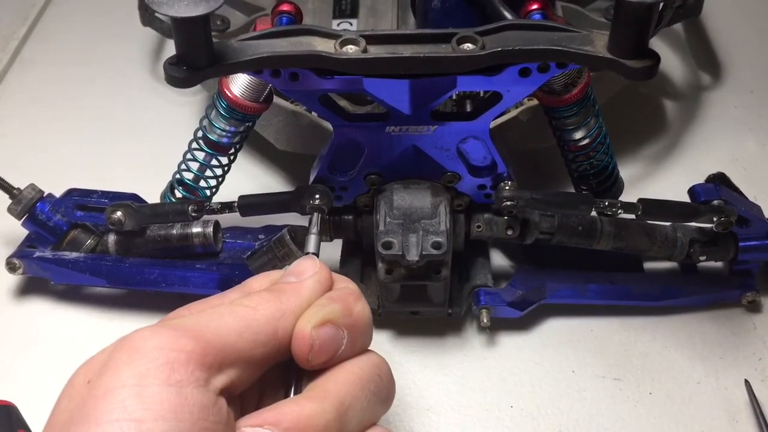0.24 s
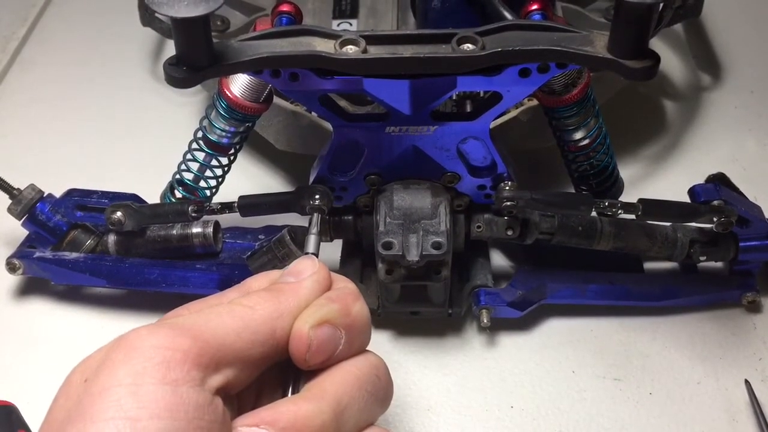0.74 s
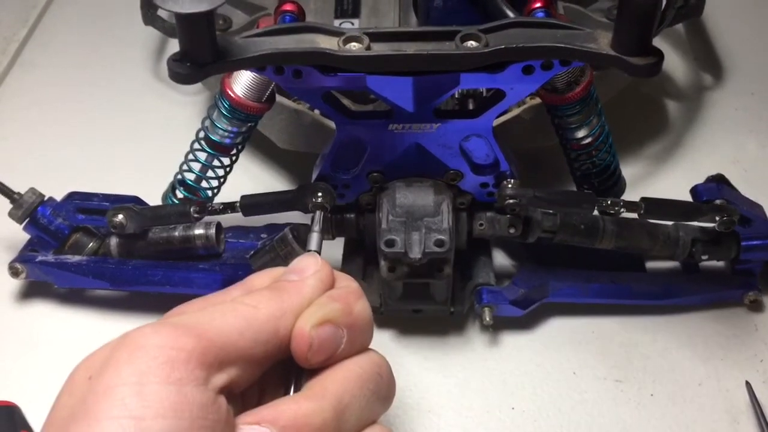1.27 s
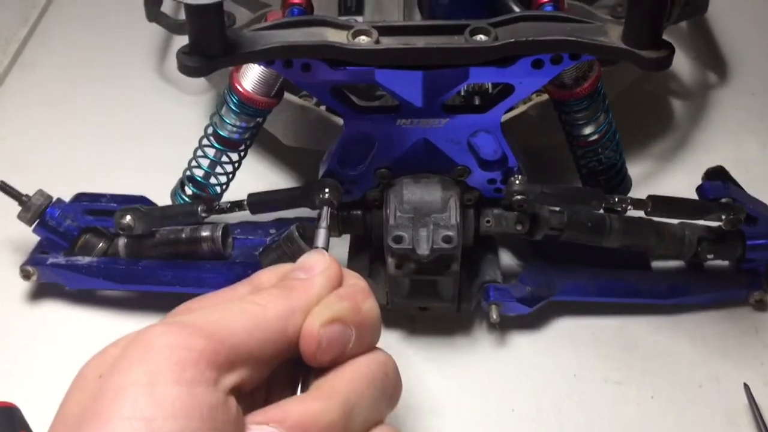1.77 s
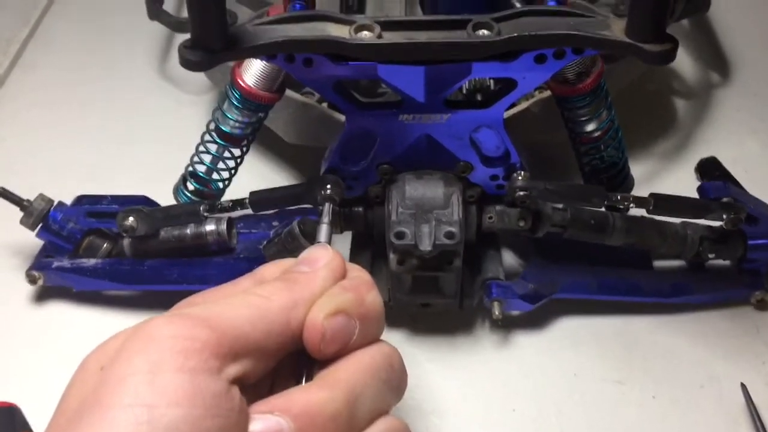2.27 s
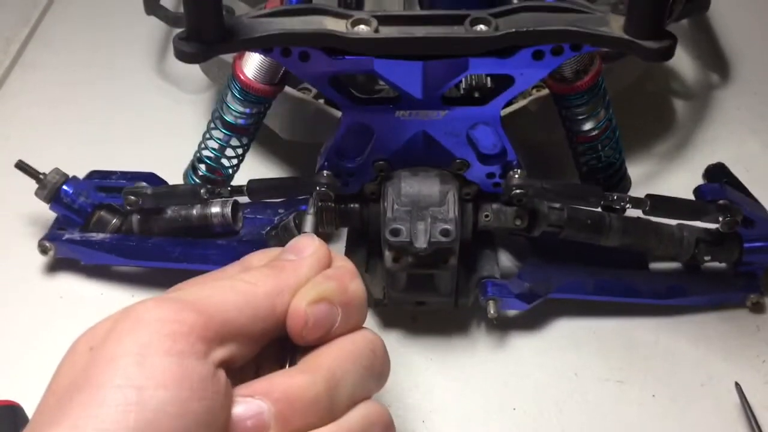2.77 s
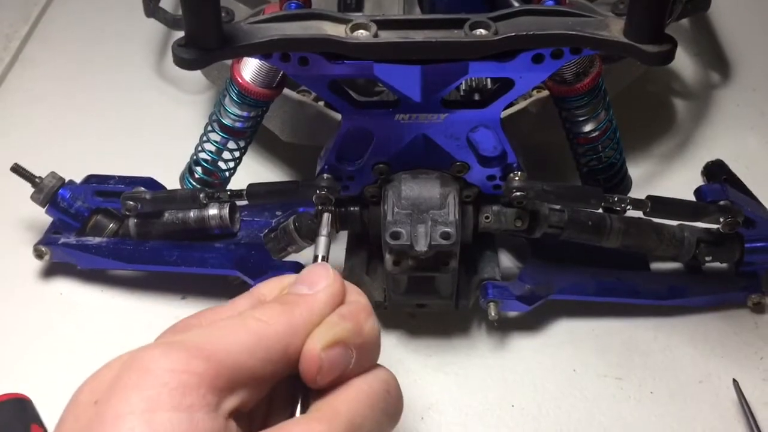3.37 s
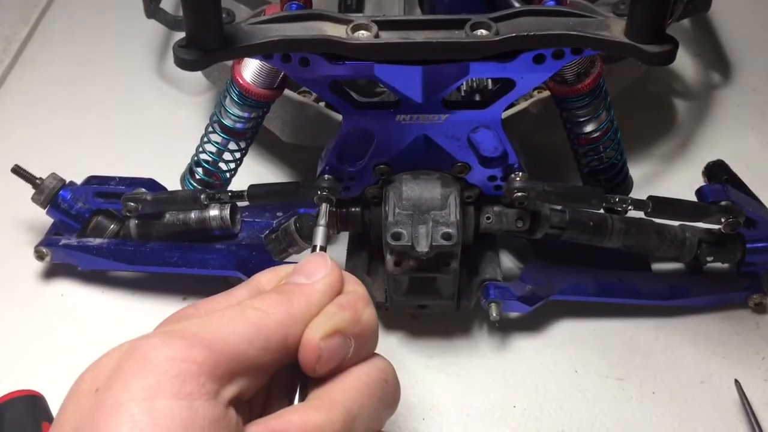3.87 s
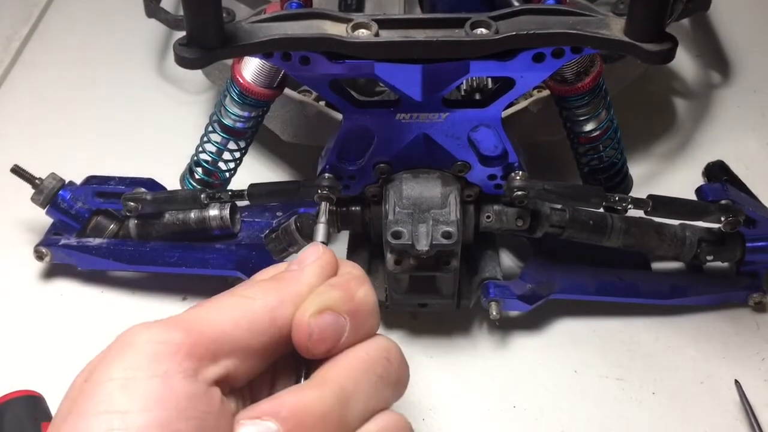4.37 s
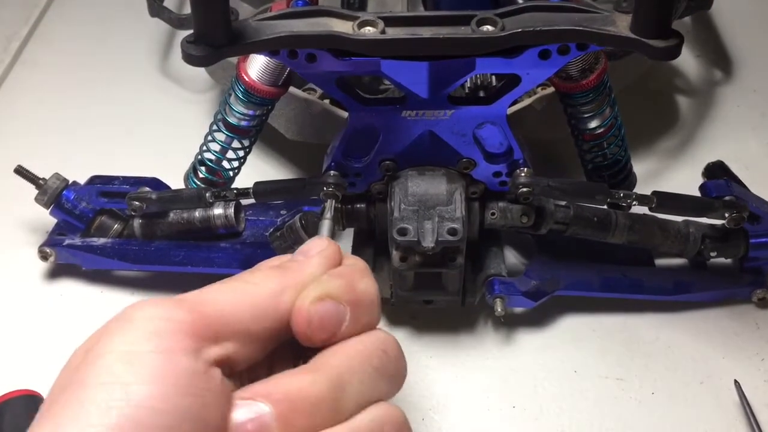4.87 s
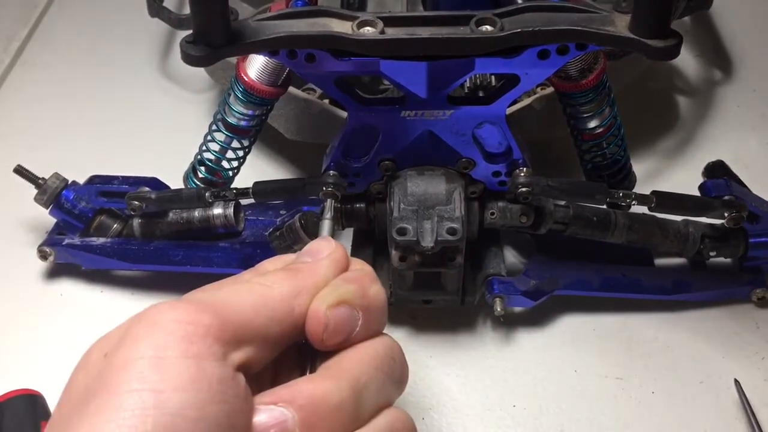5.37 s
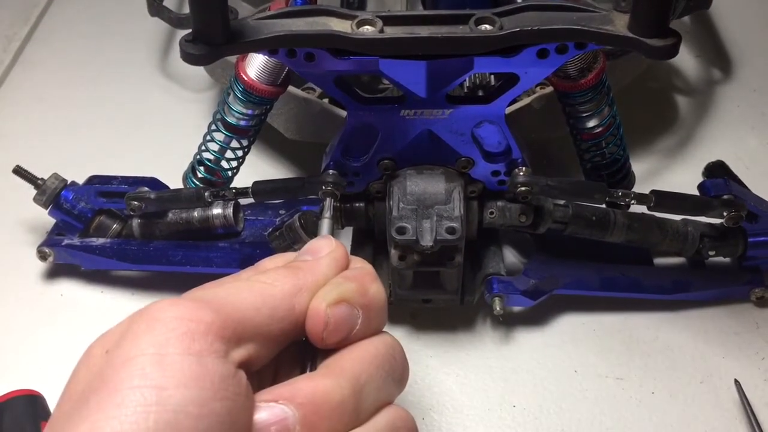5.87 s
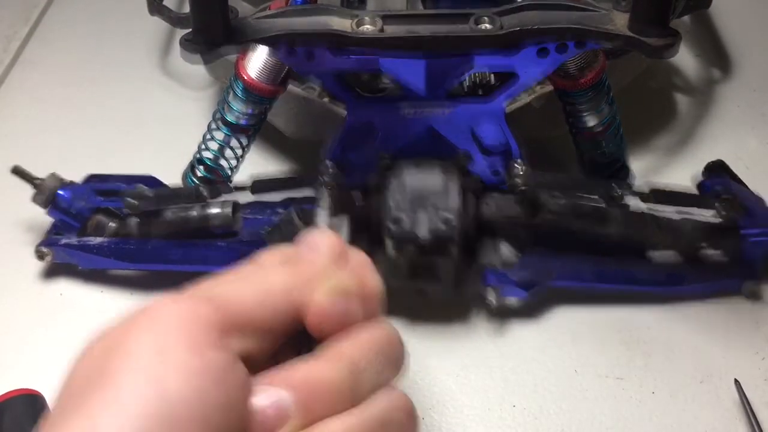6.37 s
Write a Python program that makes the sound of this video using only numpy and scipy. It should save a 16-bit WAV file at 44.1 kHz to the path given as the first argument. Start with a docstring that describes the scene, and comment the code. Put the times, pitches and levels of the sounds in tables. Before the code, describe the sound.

A close microphone in a quiet indoor room picks up low rumble and faint hiss. A soft hand bump thuds on the table at 0.3 s, a weaker one at 0.7. Hammer blows on a steel bit crack out at about 1.0, 1.5, 2.0 and 2.5 s, very loud and slightly overloaded, the later ones brighter. Each has a hard metallic clink, low tabletop boom, short hum, chattering loose parts and a faint thin ring. Little bounces clatter between them, with a sharp bright tick at 2.15. A crisp small tick at 2.9 and a soft bump near 3.0 end the burst. Then mostly quiet: a dull tick at 3.55, faint handling, a distinct tap at 5.0, and a small knock with a brief scrape around 5.9. A final full-bodied blow hits at 6.45, its ring quickly damped, followed by small rattling bounces.

```python
"""A hammer drives a steel bit against a screw in a small chassis on a table in a quiet room.
Blows and taps are shaped noise through chassis resonances, with a clink and dying sines for the table top.
Blows add chattering loose parts, a low hum and a thin steel ring; small parts ping, the bit scrapes
and hands bump the table. Sparse room echoes, rumble and hiss lie behind; overloaded peaks clip."""
import sys
import numpy as np
from scipy import signal
from scipy.io import wavfile
from scipy.ndimage import uniform_filter1d

SR = 44100
rng = np.random.default_rng(int(sys.argv[2]) if len(sys.argv) > 2 else 0)


def output_pcm(signal):
    """Save a mono or channel-first signal as 16-bit PCM at the path in sys.argv[1].

    Samples are clipped to [-1, 1] before scaling.
    """
    pcm = np.clip(np.atleast_2d(signal).T, -1, 1) * 32767
    wavfile.write(sys.argv[1], SR, np.round(pcm).astype(np.int16))


N = 292824

# Levels in the tables are layer levels ahead of the mix gains.
# Hammer blows: (time [s], crack [dB], body under 2.4 kHz [dB], clink [Hz], table [dB], hum [dB],
# shaking [dB], free ring before the grip tightens [s])
HAMMER_BLOWS = [(0.9822, -2.5, -10.5, 1462, -9, -26, -25, 0.6),
                (1.4946, -1, -10.5, 1470, -7.5, -22, -16.5, .6), (1.9928, 1, -11, 1930, -6, -15, -15, 0.64),
                (2.463, 2, -13, 2326, -7, -14.5, -12, 0.41), (6.4558, 0.5, -7, 2060, -7.5, -21, -19, 0.023)]
# Bounces and ticks of parts and tools: (time [s], crack [dB], body under 2.4 kHz [dB],
# edge over 5 kHz relative to the crack [dB], clink [Hz], table [dB])
PART_TAPS = [(1.0111, -9.5, -21, -12, 1060, -24.5), (1.3719, -46.5, -31, -20, 1037, -28),
             (1.3869, -63.5, -45, -20, 910, -30), (1.518, -8, -16.5, -17, 970, -15),
             (1.5399, -13, -34, -28, 1630, -16), (1.561, -17.5, -22.5, -29, 1780, -15),
             (1.5744, -18.5, -24, -9.5, 900, -20), (1.599, -20, -20.5, -19.5, 795, -50),
             (1.8096, -48.5, -27, -14.5, 910, -19.5), (1.8282, -47, -32, -12, 802, -27.5),
             (1.849, -46, -39, -9.5, 1500, -30.5), (2.0733, -18.5, -18, -15.5, 1256, -19),
             (2.1212, -42, -32.5, -18, 1730, -33), (2.146, -3.5, -39.5, -15, 4994, -45),
             (2.1592, -21, -35, -30, 2820, -41.5), (2.1808, -43, -34, -20, 1034, -37),
             (2.3467, -54, -34.5, -14, 1750, -30.5), (2.3767, -51, -44.5, -20, 1503, -29),
             (2.5096, -7, -14, -9.5, 3180, -11.5), (2.524, -23, -34, -4, 724, -15.5),
             (2.5532, -13, -14.5, -12, 940, -22.5), (2.596, -25.5, -22.5, -18, 1830, -25.5),
             (2.6494, -34, -34, -23, 1010, -31), (2.8484, -53.5, -33.5, -33, 812, -29),
             (2.8721, -52, -44.5, -10, 843, -34), (2.8928, -39, -46.5, -10, 5490, -36.5),
             (2.9151, -11.5, -21, -11.5, 6130, -41.5), (2.9426, -41, -46.5, -10.5, 697, -36),
             (3.0035, -27.5, -41, -8.5, 2570, -47), (3.0332, -38, -48, -10, 2780, -54),
             (3.4501, -56.5, -50.5, -18.5, 2746, -45), (3.556, -26.5, -29.5, -26.5, 2657, -34),
             (3.6522, -52, -40, -18, 1042, -42.5), (3.8686, -44.5, -42, -20, 1040, -48),
             (4.562, -58.5, -62.5, -17.5, 1300, -54), (4.759, -43, -49, -18, 1346, -51),
             (4.926, -69, -79.5, -1, 14040, -66.5), (4.9898, -11, -19, -18, 2420, -35),
             (5.8747, -24.5, -21.5, -22, 1340, -19), (5.8883, -35, -27.5, -20, 1027, -25.5),
             (6.5109, -15, -38, -27, 820, -20), (6.556, -20, -52, -14, 900, -44),
             (6.5709, -28, -35, -10, 5540, -42), (6.59, -22.5, -18.5, -17, 1800, -37.5)]
# Soft bumps of a hand on the table: (time [s], level [dB])
HAND_BUMPS = [(0.319, -19), (0.733, -38), (2.966, -18.5), (3.987, -41), (4.221, -58), (4.563, -47.5),
              (4.859, -55.5), (5.595, -48), (5.648, -49.5), (5.789, -54.5), (6.251, -43), (6.287, -52.5)]
# Short scrapes of the bit in the screw head: (start [s], length [s], level [dB], body relative to it [dB])
BIT_SCRAPES = [(1.816, 0.079, -49.5, 7.5), (2.4, .08, -62.5, 18), (3.858, 0.04, -61.5, 10),
               (3.583, 0.11, -62.5, 9), (5.871, 0.035, -26, -7), (6.24, .13, -55.5, -14)]
# Table-top modes: (frequency [Hz], level under a blow [dB], level under a tap or bump [dB], t60 [s],
# side that moves first [+1 or -1])
TABLE_MODES = [(53.7, -13, -20.5, 0.15, 1), (93, -3, -9.5, 0.12, -1), (118.2, -1.5, -1.5, .28, 1),
               (155.7, -7, -8.5, 0.026, 1), (176.3, -5.5, -15, 0.17, -1), (191.8, -13, -15, .5, 1),
               (237.8, -5.5, -13.5, 0.23, -1), (283.4, -13.5, -13.5, 0.19, -1),
               (311.3, -11.5, -14, 0.13, 1), (355.3, -11, -11.5, 0.24, -1), (415.4, -19.5, -18.5, 0.24, 1),
               (487, -13.5, -18.5, 0.18, -1), (521, -20.5, -19.5, 0.11, 1), (665, -21, -22, 0.27, -1)]
# Chassis resonances: (frequency [Hz], width [Hz], level over the plain crack [dB])
CHASSIS_MODES = [(800, 30, 1), (1054, 30, 12), (1490, 220, 3.5), (1824, 83, -0.5), (2130, 1200, -4),
                 (3234, 1100, 3.5), (3900, 460, -13), (4260, 67, 5.5), (6000, 1200, 6.5), (8570, 1500, 2.5)]
# Reverb decay: (frequency [Hz], t60 [s])
ROOM_DECAY = [(200, 0.45), (1000, .32), (2500, 0.36), (6000, .3), (9000, .23), (12000, 0.17), (16000, 0.13)]
# Tilt of the background noise: (frequency [Hz], relative density [dB per Hz])
HUSH_SPECTRUM = [(12, -65), (20, -25), (37, -2), (60, -3.5), (81, -15), (168, -12), (264, -23), (359, -20),
                 (502, -38), (546, -26), (611, -32), (855, -31), (3020, -33), (14900, -44), (16200, -43.5)]
# Small metal parts that ring on briefly after a tick: (time [s], frequency [Hz], level [dB], t60 [s])
PART_PINGS = [(2.145, 3200, -42, 0.3), (2.349, 1750, -36.5, .06), (2.916, 5860, -35, 0.17),
              (3.449, 1500, -52.5, 0.23), (3.451, 2750, -53, 0.11), (3.872, 2400, -48, 0.058),
              (4.761, 3037, -54, 0.049), (4.760, 4470, -54.5, 0.043)]

HUSH_DB = -61.5
BAND_LIMIT_HZ = 16300
RING_HZ, RING_DB = 1465, -60.5
RING_FALL_DB_PER_S, GRIP_FALL_DB_PER_S = 6, 60  # the grip's fall comes on top
HUM_HZ, HUM_T60_S = 200, 2.0  # hum of the frame; a one-second fade shortens it further
BLOW_EDGE_DB, BLOW_CLINK_DB = -11.5, -6  # relative to the crack
BLOW_T60_S = 0.07  # base decay, scaled per band in crack()
# Taps: the more the body outweighs the crack, the longer the contact noise
HARD_T60_S, SOFT_T60_S, SOFTNESS_DB = 0.0043, 0.064, 9.5
CLINK_BODY_DB, CLINK_CRACK_DB = 4.5, -3  # the clink follows whichever gives more
BLOW_PUSH_S, TAP_PUSH_S, BUMP_PUSH_S = 0.0025, 0.0012, 0.008  # each push peaks after a sixth of this
SCRAPE_EDGE_DB, SCRAPE_FADE_DB = -10, -9


def gain_of(db):
    """Amplitude factor for a level in dB."""
    return 10 ** (np.asarray(db) / 20)


def evened(x):
    """The signal scaled to an RMS of one."""
    return x / np.sqrt(np.mean(x ** 2) + 1e-20)


def read(points, hz):
    """A (frequency, value) curve read along a log frequency axis."""
    f, value = np.transpose(points)
    return np.interp(np.log(hz + 1), np.log(f + 1), value)


def add(mix, s, sound):
    """Drops a sound into the mix at s seconds, trimmed at the end."""
    part = mix[..., round(s * SR):][..., :sound.shape[-1]]
    part += sound[..., :part.shape[-1]]


def band(x, lo_hz, hi_hz):
    """Band-pass filter."""
    return signal.sosfilt(signal.butter(3, [lo_hz, hi_hz], "bandpass", fs=SR, output="sos"), x)


def resonate(x, hz, width):
    """One resonance with a gain of about one at its centre."""
    r = np.exp(-np.pi * width / SR)
    return 2 * signal.lfilter([1 - r], [1, -r * np.exp(2j * np.pi * hz / SR)], x).real


def burst(rise, t60, size=8000):
    """Envelope of an impact: a rise, then a steady fall in dB."""
    t = np.arange(size) / SR
    attack = 1 - np.exp(-t / max(rise, 1e-4))
    return attack * gain_of(-60 * t / max(t60, .004))


def ringing(modes, seconds):
    """Sum of dying sines, from (Hz, dB, t60 s) modes."""
    t = np.arange(int(seconds * SR)) / SR
    return sum(gain_of(db - 60 * t / t60) * np.sin(2 * np.pi * hz * t) for hz, db, t60 in modes)


def hush():
    """Room rumble and microphone hiss as shaped noise; the rumble is lumpy in level."""
    frames, hz = N // 256 + 5, np.fft.rfftfreq(1024, 1 / SR)
    real, imag = rng.standard_normal((frames, 513, 2)).T
    lumps = evened(uniform_filter1d(rng.standard_normal(frames), 10))
    lumps_db = 2.5 * lumps / (1 + (hz[:, None] / 300) ** 2)  # mostly under 300 Hz
    spectrum = (real + 1j * imag) * gain_of(read(HUSH_SPECTRUM, hz)[:, None] + lumps_db)
    noise = signal.istft(spectrum, nperseg=1024, noverlap=768)[1][:N]
    return gain_of(HUSH_DB) * evened(noise)


def room(x):
    """Sparse reflections of random sign, each band dying at its own speed; three tails take turns."""
    out, at = np.zeros(N), np.arange(250, SR - 20, 20)
    for k in range(3):
        taps = np.zeros(SR)
        taps[at + rng.integers(0, 20, len(at))] = rng.choice([-1., 1.], len(at))
        hz, t, z = signal.stft(taps, SR, nperseg=256)
        decay = gain_of(-60 * t / read(ROOM_DECAY, hz)[:, None])
        tail = signal.istft(z * decay, SR, nperseg=256)[1]
        # the feeds swing at 40 Hz, a third of a cycle apart
        turn = np.sqrt(2 / 3) * np.cos(2 * np.pi * (40 * np.arange(N) / SR + k / 3))
        out += signal.fftconvolve(x * turn, tail / np.linalg.norm(tail))[:N]
    return out


def table_modes():
    """The dying sine of each table-top mode, starting towards its own side."""
    return np.array([np.sign(side) * ringing([(hz, 0, t60)], .6) for hz, _, _, t60, side in TABLE_MODES])


def boom(modes, db, seconds, column, spread_db):
    """A rounded, slightly trembling force rings the table; each spot stirs the modes a little differently."""
    force = 0.022 * rng.standard_normal(8000) * burst(.004, .15)
    u = np.arange(4000) / (seconds * SR / 6)
    add(force, .001, u * np.exp(-u) * 120 / (seconds * SR))
    spot_db = spread_db * rng.standard_normal(len(TABLE_MODES))
    mode_gains = gain_of(np.array(TABLE_MODES)[:, column] + spot_db)
    return gain_of(db) * signal.fftconvolve(force, mode_gains @ modes)


def bumps(table, modes):
    """A soft hand pushes the table top slowly, so only the boom is heard."""
    for s, db in HAND_BUMPS:
        add(table, s, boom(modes, db, BUMP_PUSH_S, column=2, spread_db=4))


def scrapes(contact):
    """The bit rubs in the screw head: fading noise in body, crack and edge."""
    for s, length, db, body_db in BIT_SCRAPES:
        u = np.linspace(0, 1, int(length * SR))
        envelope = signal.windows.tukey(len(u), .5) * gain_of(SCRAPE_FADE_DB * u)
        rub = envelope * rng.standard_normal(len(u))
        add(contact[:3], s, rub * gain_of([[db + body_db], [db], [db + SCRAPE_EDGE_DB]]))


def pings():
    """Each ping is noise through a tight resonance, heard as a rough narrow band that dies away."""
    out = np.zeros(N)
    for s, hz, db, t60 in PART_PINGS:
        cluster = resonate(resonate(rng.standard_normal(12000), hz, .07 * hz), hz, .07 * hz)
        add(out, s, gain_of(db) * evened(cluster) * burst(0.00092, t60, size=12000))
    return out


def crack(crack_db, body_db, edge_db, clink_hz, clink_db, t60):
    """Gritty contact noise in rows of body, crack, edge and clink.
    A sharp first touch leads; the lower bending waves rise more slowly."""
    grit = rng.standard_normal((4, 8000)) * gain_of(2.0 * rng.standard_normal(200).repeat(40))
    touch = 1 + np.array([[1.5], [2.2], [3.0], [1.5]]) * burst(0.00013, 0.011)
    shapes = touch * [burst(0.001, 1.5 * t60), burst(0.00073, t60),
                      burst(0.00038, 1.3 * t60), burst(0.00036, 1.0 * t60)]
    noise = grit * shapes
    # same energy for every random draw
    noise *= np.linalg.norm(shapes, axis=1, keepdims=True) / np.linalg.norm(noise, axis=1, keepdims=True)
    noise[3] = 5 * resonate(resonate(noise[3], clink_hz, .14 * clink_hz), clink_hz, .25 * clink_hz)
    return gain_of([[body_db], [crack_db], [edge_db], [clink_db]]) * noise


def taps(contact, table, modes):
    """Parts and tools bounce and tick: short contact noise, a clink and a brief push on the table."""
    for s, db, body_db, edge_db, clink_hz, table_db in PART_TAPS:
        softness = 1 / (1.5 + np.exp((db - body_db) / SOFTNESS_DB))  # stays under two thirds
        t60 = HARD_T60_S + (SOFT_T60_S - HARD_T60_S) * softness
        clink_db = max(body_db + CLINK_BODY_DB, db + CLINK_CRACK_DB)
        add(contact, s, crack(db, body_db, db + edge_db, clink_hz, clink_db, t60))
        add(table, s, boom(modes, table_db, TAP_PUSH_S, column=2, spread_db=3))


def colour(contact):
    """The chassis resonances ring in the contact noise of body, crack and edge."""
    edge = band(contact[2], 5700, 11000) + gain_of(-3.5) * band(contact[2], 11000, 22000)
    body = gain_of(8.5) * band(contact[0], 310, 2400)
    middle = gain_of(-1) * band(contact[1], 2200, 4800)
    plain = body + middle + gain_of(1) * edge
    return plain + sum(gain_of(db) * resonate(plain, hz, width) for hz, width, db in CHASSIS_MODES)


def steel():
    """One thin tone from each blow, damped by the grip, for a second at most or until the next blow."""
    out = np.zeros(N)
    stops = [row[0] for row in HAMMER_BLOWS[1:]] + [N / SR]
    for (s, *_, free), stop in zip(HAMMER_BLOWS, stops):
        t = np.arange(0, min(stop - s, 1), 1 / SR)
        db = RING_DB - RING_FALL_DB_PER_S * t - GRIP_FALL_DB_PER_S * np.maximum(t - free, 0)
        add(out, s, gain_of(db) * np.sqrt(2) * np.sin(2 * np.pi * RING_HZ * t))
    return out


def shaking(db):
    """Loose parts chatter at random while the chassis settles; the treble settles first."""
    ticks = (rng.random(16000) < 1500 / SR) * gain_of(2.1 * rng.exponential(1, 16000))
    chatter = np.convolve(ticks, burst(0.00038, 0.0063, size=200))[:16000] * rng.standard_normal(16000)
    fall = burst(0.0033, 0.18, size=16000) + gain_of(-14.0) * burst(0.0085, .5, size=16000)
    # body, crack, edge; no clink
    falls = np.array([fall, fall, fall * burst(.0001, 0.24, size=16000), 0 * fall])
    return gain_of(db) * evened(chatter) * falls * gain_of([[0.5], [-0.5], [-8], [0]])


def blows(contact, table, modes):
    """The hammer hits: a crack, shaken loose parts, a table boom and a dying hum of the frame."""
    for s, db, body_db, clink_hz, table_db, hum_db, shake_db, _ in HAMMER_BLOWS:
        add(contact, s, crack(db, body_db, db + BLOW_EDGE_DB, clink_hz, db + BLOW_CLINK_DB, BLOW_T60_S))
        add(contact, s, shaking(shake_db))
        add(table, s, boom(modes, table_db, BLOW_PUSH_S, column=1, spread_db=1.5))
        hum = ringing([(HUM_HZ, hum_db, HUM_T60_S)], 1)
        add(table, s, hum * np.hanning(2 * SR)[SR:])


def scene():
    """Mixes the direct sounds, their echoes and the background."""
    contact, table = np.zeros((4, N)), np.zeros(N)  # contact rows: body, crack, edge, clink
    modes = table_modes()
    bumps(table, modes)
    scrapes(contact)
    taps(contact, table, modes)
    blows(contact, table, modes)
    chassis = gain_of(-6.5) * colour(contact)
    clinks = gain_of(-2.5) * contact[3]
    table = gain_of(-24.5) * table
    echoes = room(gain_of(-14.5) * chassis + gain_of(-20) * clinks + gain_of(-16.0) * table)
    return (chassis + clinks + table + steel() + pings() + echoes + hush())[None]


def record(dry):
    """The microphone thins the deepest bass, overloaded peaks clip, then the treble is band-limited."""
    thin = signal.sosfilt(signal.butter(3, 45, "highpass", fs=SR, output="sos"), dry)
    clipped = np.clip(thin, -.95, .95)
    lowpass = signal.firwin(511, BAND_LIMIT_HZ, window=("kaiser", 9), fs=SR)
    return signal.oaconvolve(clipped, lowpass[None], "same")


dry = scene()
out = record(dry)
output_pcm(out)
```